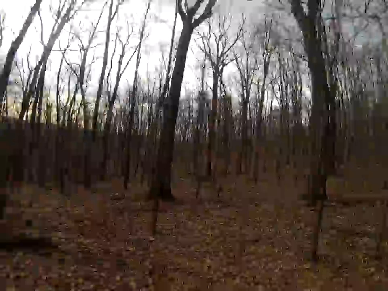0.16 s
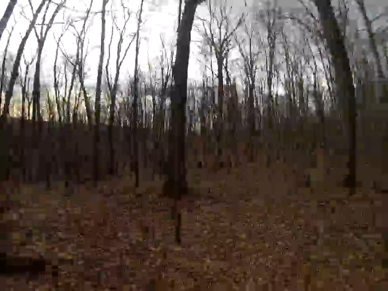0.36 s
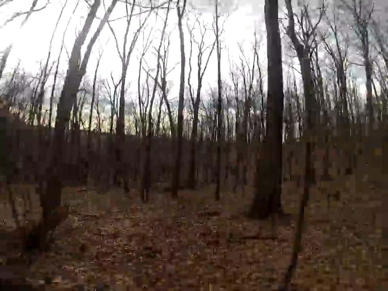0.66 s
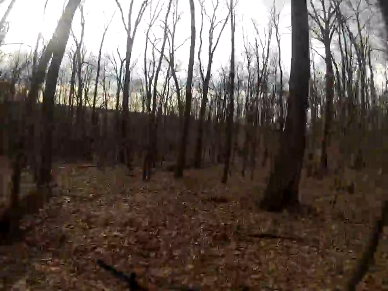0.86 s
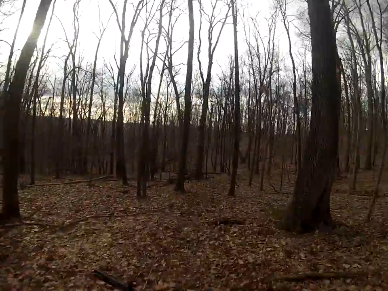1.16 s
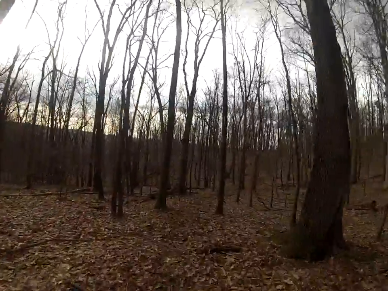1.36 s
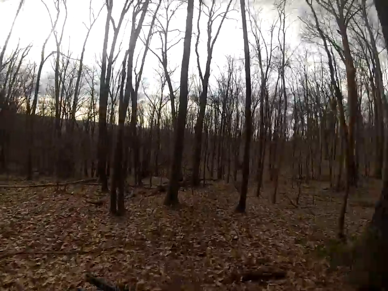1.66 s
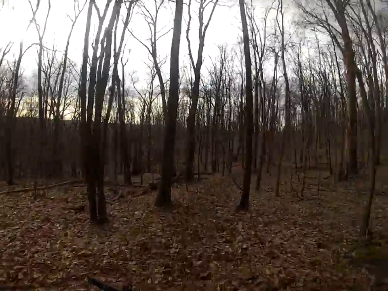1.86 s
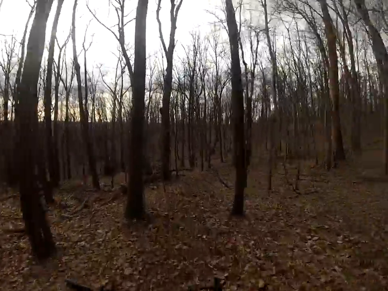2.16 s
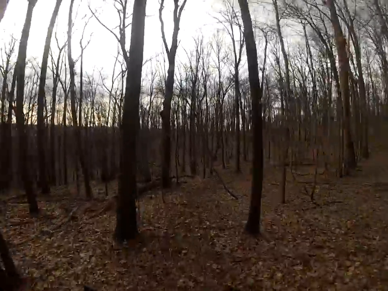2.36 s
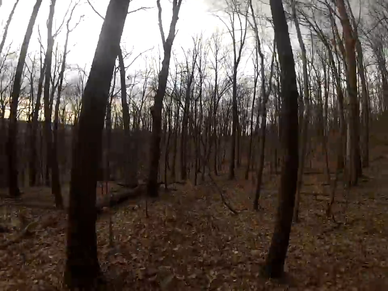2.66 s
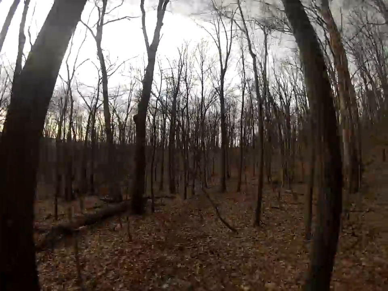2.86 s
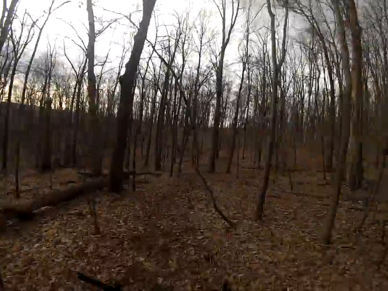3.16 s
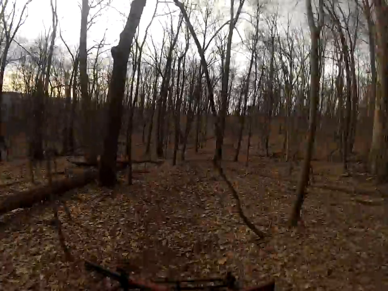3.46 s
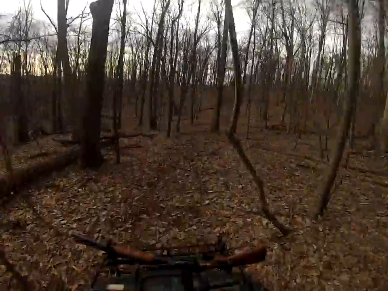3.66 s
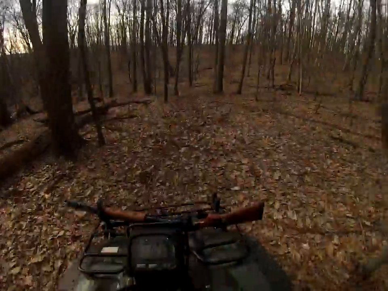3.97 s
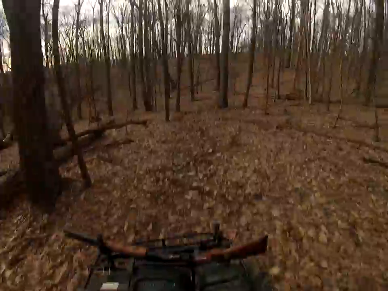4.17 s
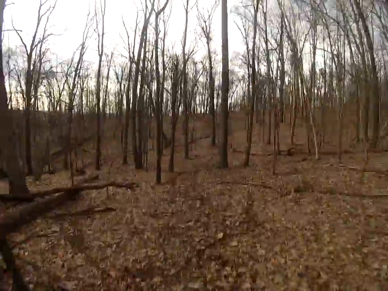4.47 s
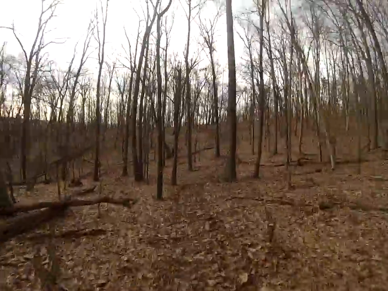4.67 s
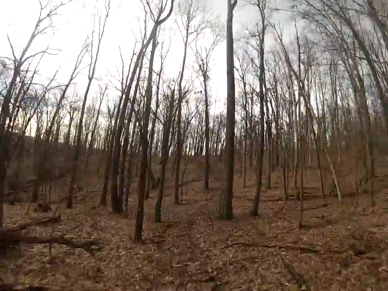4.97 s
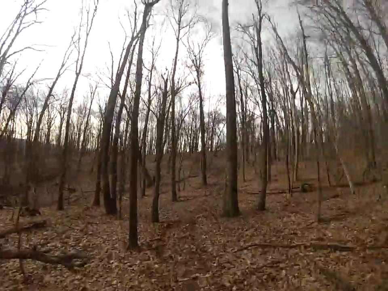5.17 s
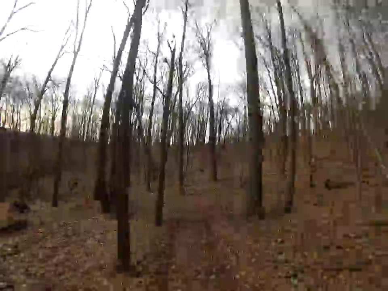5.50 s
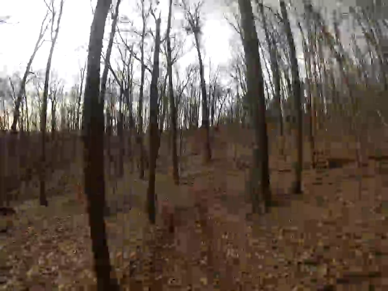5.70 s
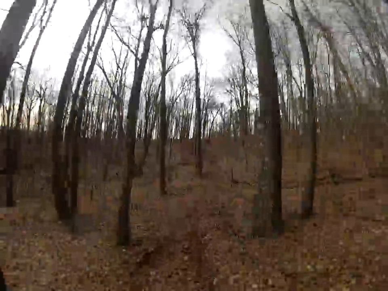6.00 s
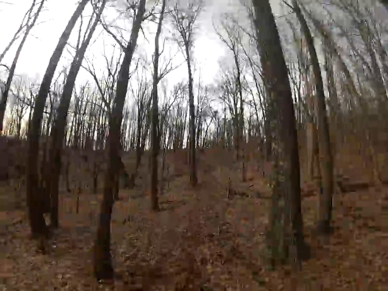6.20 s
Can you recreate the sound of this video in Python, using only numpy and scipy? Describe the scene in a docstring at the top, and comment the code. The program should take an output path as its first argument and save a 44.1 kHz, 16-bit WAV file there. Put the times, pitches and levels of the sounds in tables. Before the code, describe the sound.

Close and dry from the rider's seat, a single-cylinder all-terrain vehicle putters just above idle through open woods. Low uneven rumble and whirring machinery run throughout over rustling dry leaves. Early on, the rack clacks, twigs snap and a bump heaves the body, which then shakes. The engine quickens slightly around the middle with a hard knock, then slows as jolts and rattles bunch up near the end.

```python
"""An all-terrain vehicle crawls over a leafy woodland trail, heard for six seconds from the rider's seat.
From the start, one cylinder putters above idle amid whirring machinery, uneven rumble and rustling leaves.
Rack clacks, crushed leaves and snapping twigs come early; near 1 s a bump heaves the body, which then shakes.
Around 4 s the engine runs a little faster among more knocks and clacks, shaped noise bursts in resonances.
Then it slows; knocks, heaves, clacks and crunches bunch up near 5.5 s, and a last long rattle ends the ride."""
import sys
import numpy as np
from scipy import signal
from scipy.fft import rfft, irfft, next_fast_len
from scipy.io import wavfile
from scipy.ndimage import uniform_filter1d, map_coordinates

SR = 44100
rng = np.random.default_rng(int(sys.argv[2]) if len(sys.argv) > 2 else 0)


def digitize_waveform(pressure):
    """Quantize a signal to 16-bit integers and store it at the path in sys.argv[1].

    Rows of a 2-D input are taken as channels; values are limited to [-1, 1].
    """
    field = np.atleast_2d(pressure).T
    bounded = np.clip(field, -1, 1)
    quanta = np.round(bounded * 32767).astype(np.int16)
    wavfile.write(sys.argv[1], SR, quanta)


N = 279592

# load on the drive: t/s, machinery base level/dB, chassis drone base level/dB
DRIVE_LOAD = [(0, -53, -52.5), (.45, -53, -53), (.85, -53.5, -49.5), (1.25, -54.5, -50.5), (1.7, -54, -50),
              (2.2, -54, -51), (2.8, -56, -49.5), (3.55, -53, -51), (4.2, -54.5, -50.5),
              (4.6, -53.5, -51.5), (5.2, -52, -50.5), (5.55, -51.5, -48), (6.05, -53.5, -52),
              (6.34, -55.5, -48.5)]
# resonances of the engine case and drive: f/Hz, width/Hz, relative level/dB
CASE_RESONANCES = [(567, 630, -0.5), (908, 220, 1), (1059, 98, 3), (1421, 176, 6), (1557, 160, 5.5),
                   (2040, 740, 2), (2287, 270, 1.5), (2590, 530, -7.5), (3235, 203, -0.5), (5100, 440, -8),
                   (6480, 560, -10.5)]


def amp(db):
    """Turn decibels into a plain factor."""
    return 10 ** (np.asarray(db) / 20)


def unit(x):
    """Scale a sound to an rms of 1."""
    return x / np.sqrt(np.mean(x ** 2) + 1e-20)


def curves(rows):
    """One value per sample for each column after the time."""
    times, *columns = np.transpose(rows)
    return [np.interp(np.arange(N) / SR, times, column) for column in columns]


def wobble(rate):
    """A smooth random curve through 'rate' random points a second."""
    knots = rng.standard_normal(int(N * rate / SR) + 4)
    steps = np.arange(10 * len(knots)) / 10
    smooth = map_coordinates(knots, [steps])
    return np.interp(np.arange(N) * rate / SR, steps, smooth)


def filtered(x, response):
    """Shape a sound by a complex response, given as a function of frequency in Hz."""
    size = next_fast_len(len(x) + SR // 4)
    spectrum = rfft(x, size) * response(np.fft.rfftfreq(size, 1 / SR))
    return irfft(spectrum, size)[:len(x)]


def coloured(x, points):
    """Give a sound a spectrum drawn through (Hz, dB) points, at an rms of 1."""
    f, db = np.transpose(points)
    return unit(filtered(x, lambda hz: amp(np.interp(np.log(hz + 1), np.log(f), db))))


def resonance(f, centre, width):
    """A damped resonance: it passes its centre frequency fully and less on either side."""
    return 1j * f * width / (centre * centre - f * f + 1j * f * width)


def ring(x, modes):
    """Sum resonances (Hz, width in Hz, dB); squaring narrows them and steepens their sides."""
    return filtered(x, lambda f: sum(amp(db) * resonance(f, c, width) ** 2 for c, width, db in modes))


def contact(f, edge_hz):
    """A soft contact passes little above its edge."""
    return 1 / (1 - (f / edge_hz) ** 2 + 1j * np.sqrt(2) * f / edge_hz)


def add(track, s, db, sound):
    """Mix a sound into a track from time s (seconds), its peak at db."""
    part = track[max(round(s * SR), 0):][:len(sound)]
    part += amp(db) * sound[:len(part)] / np.abs(sound).max()


def burst(t60, attack=0.00057):
    """Noise with a quick rise and a tail that falls 60 dB in t60 seconds (at least 4 ms)."""
    t = np.arange(SR // 4) / SR
    envelope = amp(-60 * t / max(t60, .004)) * (1 - np.exp(-t / attack))
    return rng.standard_normal(len(t)) * envelope


def engine(jolt, jolt_db=1.08, puff_share=0.31, clatter_share=0.14, decay_cycles=0.31, drone_db=-3.0,
           scatter_db=5, tick_db=4):
    """Each firing drives the exhaust note, a puff into the chassis and clatter in the case."""
    # engine speed just above idle: t/s, firing rate before a slight wobble/Hz
    firing_rate = [(0, 23.6), (.2, 24.2), (.52, 23.3), (.7, 24.25), (1, 24.1), (1.15, 22.8), (1.4, 24.1),
                   (1.7, 23.9), (2, 24.8), (2.2, 24.25), (2.3, 23.6), (2.43, 24.3), (2.6, 23.6),
                   (2.77, 25.1), (2.92, 25.5), (3.08, 24.8), (3.2, 24.8), (3.35, 23.8), (3.5, 25.3),
                   (3.63, 24.7), (3.8, 25.8), (3.97, 26.1), (4.15, 25.3), (4.53, 26.1), (4.8, 25.5),
                   (4.9, 24.7), (5.1, 23.9), (5.3, 24.2), (5.5, 23.6), (5.63, 24.4), (5.83, 24.4),
                   (6.04, 22.3), (6.2, 22.9), (6.34, 24.2)]
    # spectrum of the chassis drone: f/Hz, relative level per Hz/dB
    drone_spectrum = [(60, -35), (110, 3.5), (170, -3.5), (245, 2), (340, -3.5), (460, -5), (600, -6),
                      (760, -14), (1100, -13), (2500, -41.5)]
    rate, = curves(firing_rate)
    machine_db, chassis_db = curves(DRIVE_LOAD)
    cycle = np.cumsum(rate * (1 + .008 * wobble(24))) / SR  # firings so far

    firing = unit(np.exp(-(cycle % 1) / decay_cycles) * amp(scatter_db * wobble(24)))
    breath = rng.standard_normal(N) * (1 - puff_share + puff_share * firing)
    puffs = coloured(breath, drone_spectrum)
    chassis = amp(chassis_db) * (exhaust(cycle) + amp(drone_db) * puffs)

    # the crank turns twice for each firing, and the machinery ticks along with it
    ticking = unit(np.exp(-(2 * cycle % 1) / decay_cycles) * amp(tick_db * wobble(50)))
    ticks = 1 - clatter_share + clatter_share * ticking
    clatter = 0
    for mode in CASE_RESONANCES:
        clatter = clatter + ring(rng.standard_normal(N) * ticks, [mode]) * amp(wobble(7))
    machinery = amp(machine_db + jolt_db * jolt) * unit(clatter)
    return shaking(cycle) + whine() + chassis + machinery


def exhaust(cycle, note_db=-6.5, uneven_db=3):
    """One throb for each firing, uneven in strength, built from multiples of the firing rate."""
    # exhaust note: multiple of the firing rate, relative level/dB
    note = [(1, 6), (3, 3.5), (4, -2), (5, -0.5), (6, -8), (7, -10), (8, -10.5), (9, -7.5), (10, -7.5),
            (11, -9.5)]
    throbs = np.zeros(N)
    for k, db in note:
        # the pipe holds back the phase of multiples above the fifth and advances those below
        lag = np.arctan(k - 5)
        drift = .5 * wobble(3) + .3 * wobble(14)
        throbs += amp(db) * np.cos(2 * np.pi * round(k) * (cycle - .12) - lag + drift)
    return np.sqrt(2) * amp(note_db + uneven_db * wobble(18)) * throbs


def shaking(cycle, rest_db=-56, fade_s=0.1):
    """The body swings with the crankshaft, twice for each firing, and resonates for a while at times."""
    # spells of resonance: middle of fade-in t/s, middle of fade-out t/s, swing added to the rest/dB
    spells = [(0, 0.595, -44), (1.186, 1.32, -38), (1.39, 2.078, -33.5)]
    t = np.arange(N) / SR
    swing = amp(rest_db)
    for start, end, db in spells:
        swing = swing + amp(db) * np.clip(np.minimum(t - start, end - t) / fade_s + .5, 0, 1)
    return np.sqrt(2) * swing * amp(wobble(21.2)) * np.sin(2 * np.pi * 2 * cycle)


def whine(whine_db=-68.5, flutter_db=4.0):
    """The belt drive sings faintly, gliding with its speed; belt slip makes the line waver and break up."""
    # whine of the belt drive, which lags behind the engine: t/s, pitch before slip/Hz
    glide = [(0, 897), (.2, 921), (.56, 896), (.72, 930), (.85, 912), (1.6, 914), (1.88, 937), (2.08, 930),
             (2.22, 907), (2.42, 925), (2.58, 900), (2.72, 928), (3.12, 947), (3.3, 924), (3.62, 940),
             (4.1, 960), (4.52, 994), (4.85, 945), (5.1, 909), (5.38, 932), (5.5, 898), (5.75, 932),
             (6.05, 885), (6.34, 910)]
    slip = .005 * wobble(22) + .004 * wobble(70)
    turns = np.cumsum(curves(glide)[0] * (1 + slip)) / SR
    return np.sqrt(2) * amp(whine_db + flutter_db * wobble(12)) * np.sin(2 * np.pi * turns)


def ride(lurch_db=2.0):
    """Rough ground keeps the machine rumbling; bumps swing its body for a moment."""
    # roughness of the ground: t/s, rumble level before random lurches/dB
    roughness = [(0, -30.5), (.3, -31.5), (.85, -33.5), (.97, -42), (1.3, -39), (1.65, -41.5), (1.9, -36),
                 (2.24, -37.5), (2.53, -28.5), (2.88, -41.5), (3, -35.5), (3.15, -38.5), (3.3, -33),
                 (3.4, -40.5), (3.5, -33), (3.75, -32), (3.94, -42.5), (4.07, -36.5), (4.55, -37),
                 (5.03, -33), (5.13, -32), (5.55, -30), (5.77, -35.5), (6, -29.5), (6.34, -38)]
    # spectrum of the rumble: f/Hz, relative level per Hz/dB
    rumble_spectrum = [(8, -7), (16, 3), (26, -1), (48, -3), (60, -12.5), (80, -17.5), (130, -39),
                       (250, -67.5)]
    # the body heaves over bumps: crest t/s, peak level/dB, f/Hz, half length/s
    heaves = [(0.834, -23.5, 41.5, 0.054), (1.096, -11.5, 42, 0.03), (2.606, -26.5, 48.4, 0.048),
              (3.019, -27.5, 43.4, 0.066), (3.248, -21, 48, 0.023), (5.404, -21, 27.5, .028),
              (5.548, -19, 24, 0.05), (5.594, -17.5, 31.6, 0.048), (5.564, -20.5, 49.7, 0.033),
              (5.918, -21.5, 36, 0.078)]
    rumble = coloured(rng.standard_normal(N), rumble_spectrum)
    # dividing by the running loudness leaves the ground to set the level
    swell = np.sqrt(np.abs(uniform_filter1d(rumble ** 2, size=3000)) + 0.0097)
    out = rumble / swell * amp(curves(roughness)[0] + lurch_db * wobble(12))
    for s, db, hz, half in heaves:
        t = np.arange(N) / SR - s
        out += amp(db) * np.exp(-(t / half) ** 2) * np.cos(2 * np.pi * hz * t)
    return out


def knocks(relative_width=0.59, judder_db=-49, judder_s=0.097):
    """A short push into the damped chassis, which judders on faintly; softer contacts lose upper range."""
    # dull chassis knocks: t/s, peak level of the push/dB, pitch f/Hz, upper edge f/Hz
    pushes = [(0.784, -42, 524, 750), (0.793, -32, 254, 560), (.992, -41, 328, 700),
              (1.521, -38.5, 476, 800), (1.783, -33, 440, 457), (1.7874, -38, 426, 460),
              (3.214, -32, 65, 170), (3.2248, -24, 63.6, 219), (3.618, -36, 179, 500),
              (3.797, -39, 228, 500), (3.823, -35, 234, 700), (4.0256, -22, 210, 1270),
              (4.19, -40, 410, 520), (5.048, -37, 400, 800), (5.102, -27, 230, 596), (5.324, -37, 480, 800),
              (5.513, -38, 603, 900), (5.528, -36, 520, 900), (5.696, -36.5, 600, 900)]
    out = np.zeros(N)
    for s, db, hz, edge_hz in pushes:
        judder = burst(judder_s)
        push = signal.unit_impulse(len(judder))
        body = lambda f: resonance(f, hz, relative_width * hz) * contact(f, edge_hz)
        add(out, s, db, filtered(push, body))
        add(out, s, judder_db, filtered(judder, body))
    return out


def rack(main_width_hz=420, main_db=2, blow=4, rise_s=0.00047):
    """The padded load strikes the rack and chatters on plastic panels; little sounds above the main ring."""
    # the rack rattles: t/s, peak level/dB, main ring f/Hz, t60 of the chatter/s
    clacks = [(0.194, -36.5, 2120, 0.14), (0.333, -38, 2080, 0.058), (0.681, -38.5, 1530, 0.079),
              (0.711, -39, 1350, 0.083), (0.741, -39.5, 2290, 0.17), (0.7755, -29, 1550, 0.024),
              (0.903, -41, 1570, 0.032), (0.989, -35.5, 1360, 0.12), (1.126, -42, 1480, 0.043),
              (1.181, -37, 1440, 0.04), (2.038, -37.5, 1590, 0.053), (3.405, -36, 1410, 0.13),
              (3.516, -38.5, 1500, 0.027), (3.54, -39, 2070, 0.062), (3.627, -40, 1490, 0.016),
              (3.79, -34, 1540, 0.036), (3.824, -36.5, 1480, 0.06), (3.843, -36.5, 1480, 0.044),
              (3.856, -41, 1500, 0.065), (3.98, -38.5, 2220, 0.086), (5.321, -36.5, 1390, 0.045),
              (5.371, -36.5, 1990, 0.083), (5.508, -40, 1190, 0.06), (5.516, -31.5, 1440, 0.07),
              (5.535, -39, 1450, .04), (5.678, -36.5, 1430, 0.041), (5.818, -37, 1500, 0.094),
              (6.295, -38.5, 1460, 0.24)]
    # rack and plastic panels: f/Hz, width/Hz, relative level before scatter/dB
    panels = [(572, 294, -2.5), (1077, 290, 1), (1520, 560, -1.5), (2060, 950, -3.5)]
    out = np.zeros(N)
    for s, db, hz, chatter_s in clacks:
        chatter = burst(chatter_s, attack=rise_s)
        chatter[0] += blow  # the first hit
        # each strike excites the panels a little differently
        modes = [(pitch, width, level + rng.normal(0, 1.8)) for pitch, width, level in panels]
        modes.append((hz, main_width_hz, main_db))
        padded = filtered(chatter, lambda f: contact(f, 1.65 * hz) ** 2)
        add(out, s, db, ring(padded, modes))
    return out


def jiggle(jiggle_db=-10, spike_db=7, jolt_db=2.5, taps_per_s=60):
    """Loose parts keep ticking against the rack: random taps ring the same resonances as the engine case."""
    strength = amp(spike_db * rng.random(N) + jolt_db * wobble(3.9))
    taps = (rng.random(N) < taps_per_s / SR) * strength
    return amp(curves(DRIVE_LOAD)[0] + jiggle_db) * unit(ring(taps, CASE_RESONANCES))


def twigs(snap_db=-1, snap_width=0.21, snap_s=0.03, splinter_db=-17, wood_db=-7):
    """A twig breaks with a short bright ring, a woody crack and a spray of splinters."""
    # twigs snap: t/s, peak level before snap_db/dB, pitch f/Hz
    snaps = [(0.194, -38.5, 3230), (0.195, -37.5, 5370), (0.2233, -41, 3200), (0.223, -41, 7950),
             (1.528, -41, 2830), (1.5526, -32, 6700), (1.6266, -33.5, 7000), (1.627, -37.5, 11800),
             (3.2976, -40, 5470)]
    out = np.zeros(N)
    for s, db, hz in snaps:
        modes = [(hz, snap_width * hz, 0), (11500, 2500, splinter_db), (2300, 2200, wood_db)]
        add(out, s, db + snap_db, ring(burst(snap_s, attack=0.00068), modes))
    return out


def leaves(jolt, crunch_db=-2, jolt_db=0.9, release_s=0.017):
    """Tyres roll over a bed of dry leaves and press thicker clumps until they give way."""
    # depth of the leaf litter under the tyres: t/s, rustle level before jolts/dB
    litter = [(0, -57.5), (.3, -55.5), (1.1, -60), (1.55, -58), (2.4, -59.5), (3, -61), (3.5, -58.5),
              (4.3, -62.5), (4.6, -60.5), (5.2, -57.5), (5.55, -57), (6.34, -59.5)]
    # spectrum of the rustle: f/Hz, relative level per Hz/dB
    leaf_spectrum = [(1000, -36), (2400, 2.5), (3700, 3), (4500, 1), (5200, -0.5), (5900, -2), (6600, 0),
                     (7500, 0), (8300, -4), (9400, -10), (11300, -7.5), (13000, -9.5), (15300, -8.5)]
    # crushed clumps: crush t/s, peak level before crunch_db/dB, fizz over crackle/dB, build-up/s
    crunches = [(.23, -40.5, -6, 0.025), (.412, -40.5, -2, .012), (.555, -43, -12, 0.016),
                (.745, -39.5, 1, 0.026), (1.425, -44, -10, 0.016), (1.73, -46, -10, 0.023),
                (2.091, -36, -9, 0.014), (2.135, -44.5, -11, 0.028), (3.414, -45.5, -20, .01),
                (3.752, -44.5, -15, 0.044), (3.985, -41.5, -16, 0.0096), (4.498, -44.5, -7, 0.012),
                (4.59, -51, 2, .02), (4.745, -42, -5, 0.023), (4.8, -37, -2, 0.025),
                (5.46, -43, -12, 0.015), (5.812, -40, -15, 0.038), (5.955, -43, -9, .012),
                (6.15, -44, -12, .012)]
    rustle = coloured(cracks(grain_db=1.5, flutter_db=1.04), leaf_spectrum)
    out = amp(curves(litter)[0] + jolt_db * jolt) * rustle
    t = np.arange(SR * 2 // 5) / SR - 1 / 5  # seconds from the crush
    grains = cracks(grain_db=3.3, flutter_db=1.2)
    for s, db, fizz_db, build_s in crunches:
        press = np.exp(-(t / np.where(t < 0, build_s, release_s)) ** 2)
        clump = np.roll(grains, -round(s * SR))[:len(t)] * press  # other grains for each clump
        crackle, fizz = (5920, 5000, 0), (10420, 2400, fizz_db)
        add(out, s + t[0], db + crunch_db, ring(clump, [crackle, fizz]))
    return out


def cracks(grain_db, flutter_db):
    """Noise broken up into tiny dry cracks."""
    return rng.standard_normal(N) * amp(grain_db * wobble(1500) + flutter_db * wobble(25))


def scene():
    """Everything is close and dry in the open woods; small jolts stir machinery and leaves together."""
    jolt = unit(wobble(16) + wobble(40))
    vehicle = engine(jolt) + ride() + knocks() + rack() + jiggle()
    return (vehicle + twigs() + leaves(jolt))[None]


def record(dry, dull_hz=13500, top_hz=15350):
    """The microphone fades in the top treble and keeps nothing from its band limit upwards."""
    microphone = lambda hz: (hz < top_hz) / np.sqrt(1 + (hz / dull_hz) ** 10)
    return np.array([filtered(channel, microphone) for channel in dry])


dry = scene()
out = record(dry)
digitize_waveform(out)
```